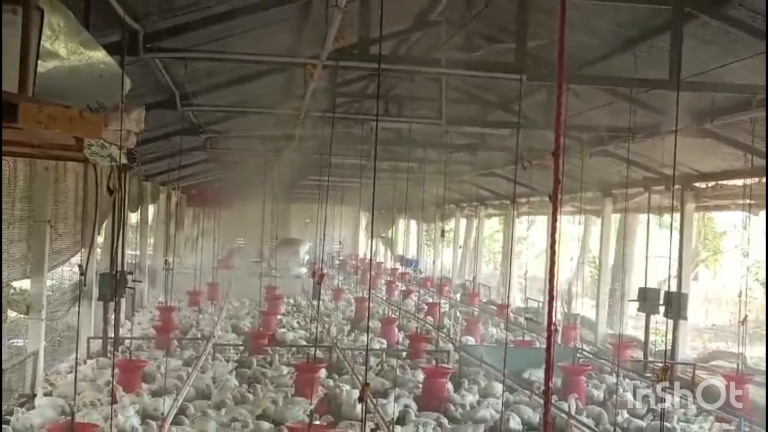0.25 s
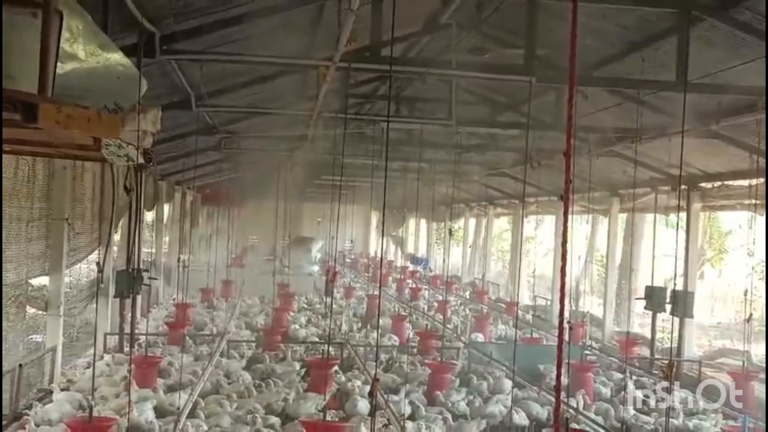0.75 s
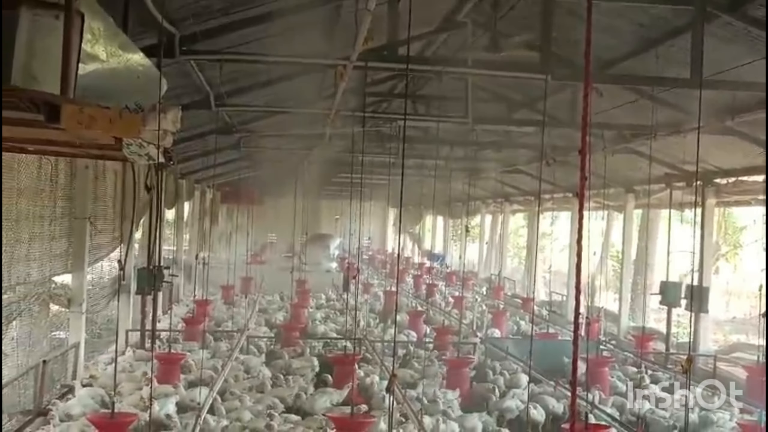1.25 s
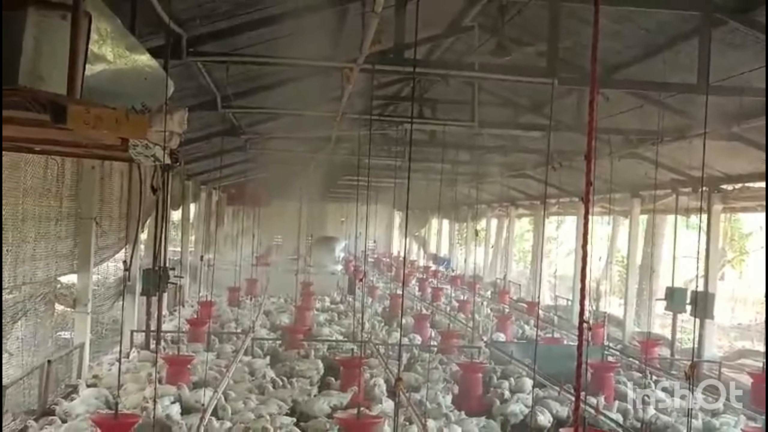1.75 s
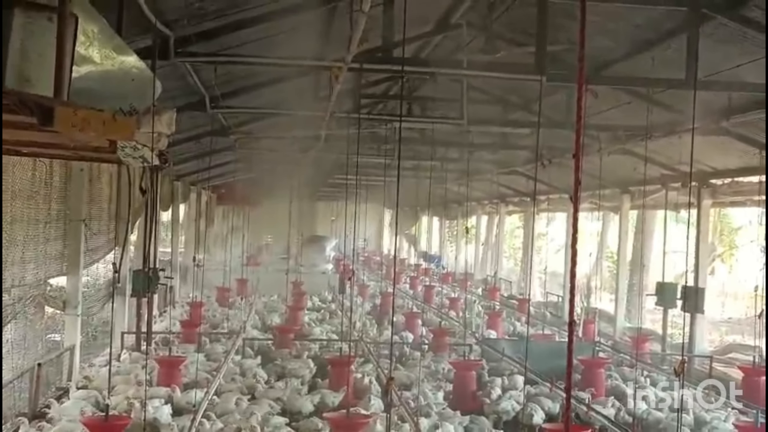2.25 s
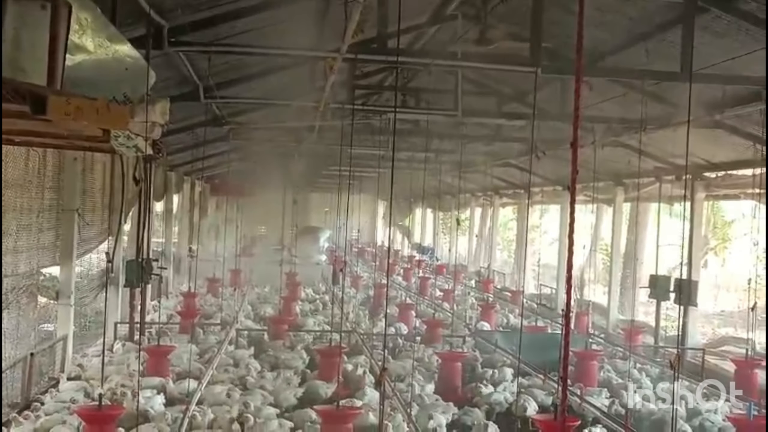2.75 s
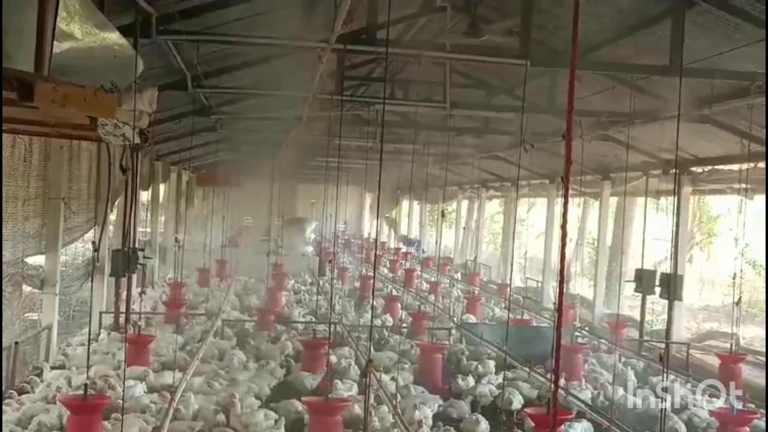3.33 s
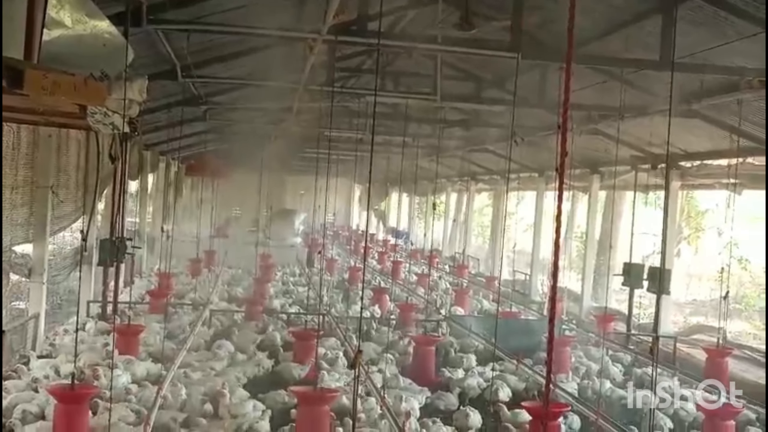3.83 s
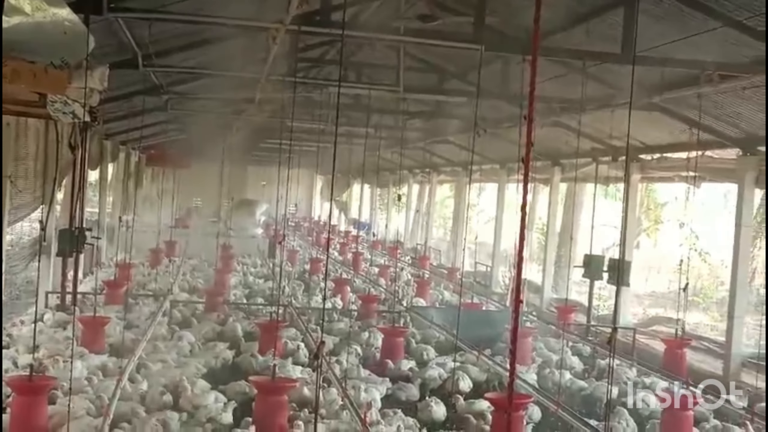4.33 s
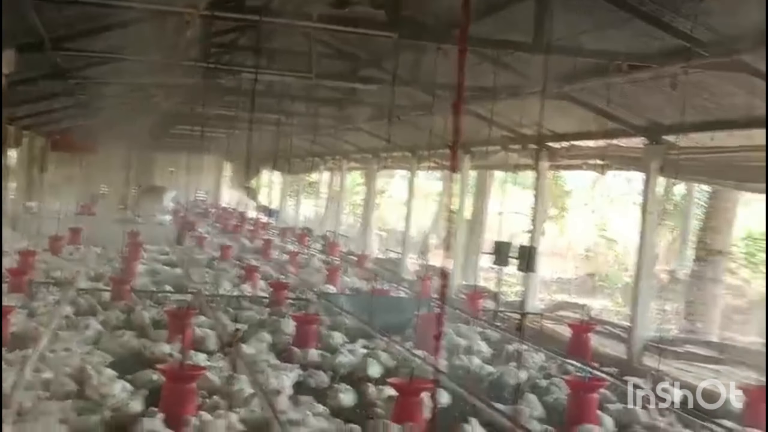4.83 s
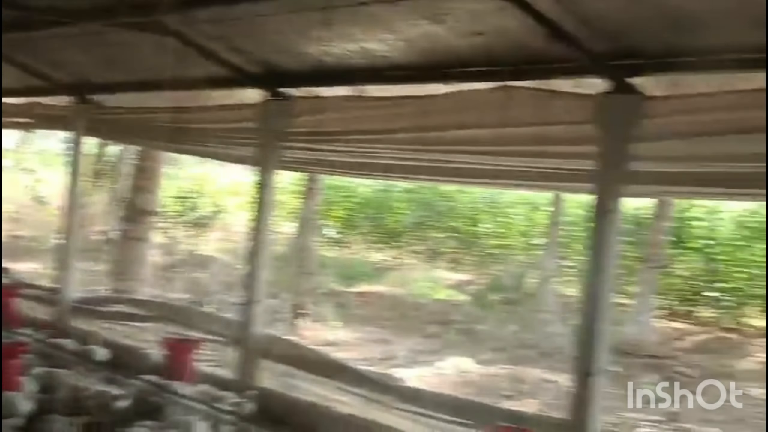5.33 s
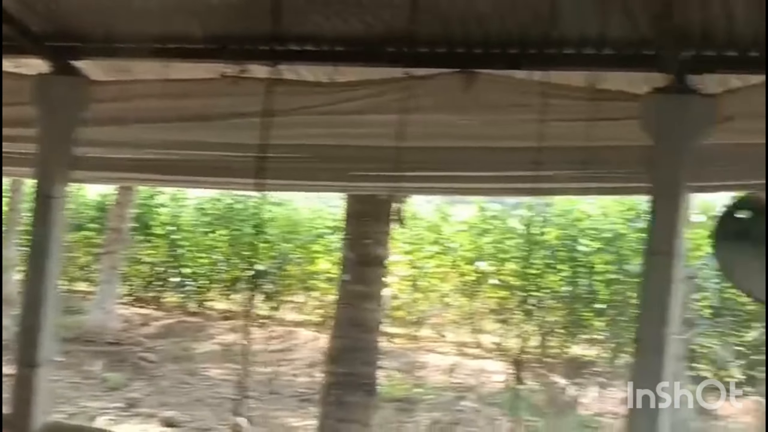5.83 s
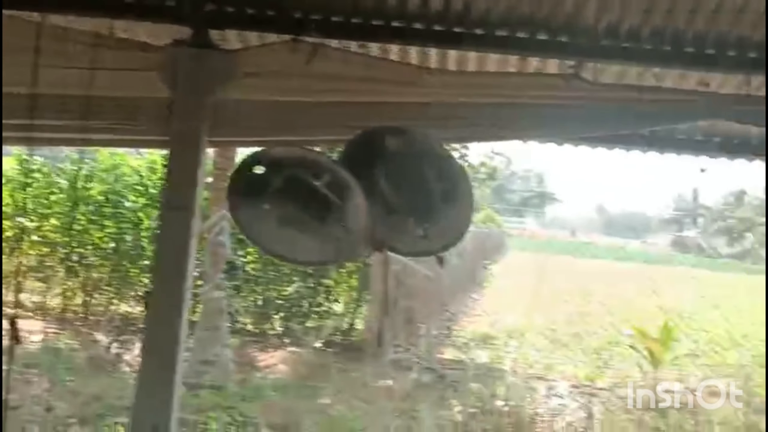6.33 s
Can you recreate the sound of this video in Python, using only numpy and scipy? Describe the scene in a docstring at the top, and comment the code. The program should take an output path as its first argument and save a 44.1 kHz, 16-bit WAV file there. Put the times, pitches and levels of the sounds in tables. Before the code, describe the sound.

A large flock of young chickens cheeps densely in a shed over a low throbbing machine hum and a faint mist hiss.

```python
"""A large flock of young chickens in an open-sided shed, heard by a two-port phone microphone.
From the start, near calls stand out of a dense chorus whose low edge cuts in and out, a machine hum
throbs over a low rumble and mist nozzles hiss overhead. From 0.5 s, harsh outbursts break in.
After 4.9 s the lower chorus fades as the phone turns away. The hum throbs hardest near 5.9 s;
a strong nozzle sputter and a loud near peep come just before the end."""
import sys
import numpy as np
from scipy import signal
from scipy.fft import rfft, irfft, next_fast_len
from scipy.io import wavfile
from scipy.ndimage import uniform_filter1d

SR = 44100
rng = np.random.default_rng(int(sys.argv[2]) if len(sys.argv) > 2 else 0)


def wav_out(sig):
    """Save sig, one row per channel (or a flat mono array), as 16-bit PCM at SR to the path in sys.argv[1]."""
    wavfile.write(sys.argv[1], SR, np.round(np.clip(np.atleast_2d(sig).T, -1, 1) * 32767).astype(np.int16))


N = 290178


def amp(db):
    return 10 ** (np.asarray(db) / 20)


def unit_rms(x):
    return x / np.sqrt(np.mean(x ** 2) + 1e-20)


def at_hz(curve, hz):
    """Value of a curve, interpolated over log frequency."""
    knots_hz, values = np.transpose(curve)
    return np.interp(np.log(hz + 1), np.log(knots_hz + 1), values)


def envelope(curve):
    """Gain per sample from rows of seconds and dB."""
    times_s, db = np.transpose(curve)
    return amp(np.interp(np.arange(N) / SR, times_s, db))


def colour(x, gain_db):
    """Filter by gain_db, a function of frequency in Hz."""
    size = next_fast_len(x.shape[-1])
    gain = amp(gain_db(np.fft.rfftfreq(size, 1 / SR)))
    return irfft(rfft(x, size) * gain, size)[..., :x.shape[-1]]


def wander(depth_db, top_hz):
    """Slow chance gain: sines of random phase up to top_hz."""
    t = np.arange(0, N + 64, 64) / SR
    rates_hz = np.geomspace(top_hz / 8, top_hz, num=24)
    waves = sum(np.sin(2 * np.pi * (hz * t + rng.random())) for hz in rates_hz)
    return amp(depth_db * np.interp(np.arange(N) / SR, t, unit_rms(waves)))


# Likeness of noise at the two ports. Each row: frequency in Hz, correlation.
PORT_CORRELATION = [(40, .3), (130, .9), (300, .9), (640, .5), (1300, 0), (1900, -.05), (2700, .25),
                    (3800, 0)]
def noise(spectrum, patch_db, flicker_db, fft_size):
    """Stereo noise with drifting patches and a flicker shared by all frequencies."""
    hop = fft_size // 4
    frames, hz = N // hop + 5, np.fft.rfftfreq(fft_size, 1 / SR)
    left_re, left_im, other_re, other_im, patches = rng.standard_normal((frames, len(hz), 5)).T
    patches = uniform_filter1d(patches, size=9, axis=0)
    patches = unit_rms(uniform_filter1d(patches, size=12, axis=1))
    flicker = unit_rms(uniform_filter1d(rng.standard_normal(frames), size=5))
    correlation = np.clip(at_hz(PORT_CORRELATION, hz), -1, 1)[:, None]
    left = left_re + 1j * left_im
    right = correlation * left + np.sqrt(1 - correlation ** 2) * (other_re + 1j * other_im)
    gain = amp(at_hz(spectrum, hz)[:, None] + patch_db * patches + flicker_db * flicker)
    _, out = signal.istft(np.array([left, right]) * gain, nperseg=fft_size, noverlap=fft_size - hop)
    return unit_rms(out[:, :N])


def calls(rows, rasp, harmonics, tint, max_lag_samples):
    """Gliding tones, rough from the uneven flutter of the syrinx; tint scales the voice colour."""
    out = np.zeros((2, N + SR))
    draws = rng.random((len(rows), 2))
    flutters = rng.standard_normal((len(rows), 40)) * np.reshape(rasp, (-1, 1))
    k = np.arange(1, harmonics + 1)
    for row, (lag, start_cycle), flutter in zip(rows, draws, flutters):
        start_s, length_s, start_hz, end_hz, db, pan_db, step_db = row
        progress = np.linspace(0, 1, max(round(length_s * SR), 64))
        cycles = np.cumsum(start_hz + (end_hz - start_hz) * progress) / SR + start_cycle
        mid_hz = (start_hz + end_hz) / 2
        voice_db = at_hz(VOICE_SPECTRUM, k * mid_hz) - at_hz(VOICE_SPECTRUM, mid_hz)
        gains = amp(step_db * (k - 1) + tint * voice_db) * (k * mid_hz < 7500)
        tone = gains @ np.sin(2 * np.pi * k[:, None] * cycles)
        tone *= 1 + np.interp(260 * length_s * progress, np.arange(len(flutter)), flutter)
        tone *= np.sin(np.pi * progress ** .75) ** .9
        start = round(max(start_s, 0) * SR)
        out[0, start + round(2 * max_lag_samples * lag):][:len(tone)] += amp(db + pan_db / 2) * tone
        out[1, start + max_lag_samples:][:len(tone)] += amp(db - pan_db / 2) * tone
    return out[:, :N]


def crowd(count, low_hz, high_hz, spread_db, fall):
    """Rows for calls(): short, falling, log-spread in pitch, a few birds nearer than the rest."""
    start, length, pitch, glide, distance, side = rng.random((count, 6)).T
    start_s, length_s = start * N / SR, .022 + .035 * length
    hz = low_hz * (high_hz / low_hz) ** pitch
    drop = fall * (glide + .15)
    db = -spread_db * np.log(distance + 0.047)
    pan_db, step_db = 16 * (side - .5), np.full(count, -2.5)
    return np.transpose([start_s, length_s, hz * (1 + drop), hz * (1 - drop), db, pan_db, step_db])


def shed_echo(x, t60_s):
    """Sparse reflections of random sign from roof, floor and posts."""
    taps = np.zeros((2, SR // 2))
    delays = np.arange(200, SR // 2 - 20, 20) + rng.integers(0, 20, (2, (SR // 2 - 201) // 20))
    np.put_along_axis(taps, delays, rng.choice([-1., 1.], delays.shape), 1)
    taps *= amp(-60 * np.arange(SR // 2) / SR / t60_s)
    return signal.fftconvolve(x, taps / np.linalg.norm(taps[0]), axes=1)[:, :N]


# Colour of the flock's voices. Each row: frequency in Hz, gain in dB.
VOICE_SPECTRUM = [(600, -62), (800, -44), (920, -24), (1030, -4), (1130, 0), (1510, -2), (2360, -5),
                  (2800, -11.5), (3150, -22), (3540, -25), (3900, -24), (4400, -29), (4800, -25),
                  (5100, -19), (5470, -19), (7500, -26), (8700, -30), (9360, -40), (16000, -60)]
# Ebb and swell of the chorus. Each row: time in seconds, gain in dB.
CHORUS_GAIN = [(0.0, -29), (.33, -28.5), (.51, -31), (.78, -30), (2.34, -29), (2.52, -30.5), (2.72, -29.5),
               (3.9, -30), (4.59, -29), (5.59, -29), (6.38, -29), (6.49, -31.5), (6.57, -28.5)]
# Fade of the lower chorus as the phone turns away. Each row: time in seconds, gain in dB.
TURN_GAIN = [(0.0, 0.5), (4.9, -0.5), (5.6, -7.5), (6.57, -9.5)]
# Top of the chorus, near 3.4 kHz, and the high peeps. Each row: time in seconds, gain in dB.
TOP_GAIN = [(0.0, -47), (0.99, -46.5), (1.19, -45), (1.41, -44.5), (2.22, -48), (2.35, -43), (2.78, -48.5),
            (2.9, -45), (3.17, -47.5), (3.3, -43.5), (4.01, -50.5), (4.4, -42), (4.53, -43.5), (5.0, -49.5),
            (5.13, -44.5), (5.42, -51), (5.55, -49), (5.66, -50), (5.92, -49), (6.21, -47), (6.58, -51)]
def chorus():
    """Over a hundred peeps a second, melting with distance into a murmur of the same colour."""
    rows = crowd(count=900, low_hz=950, high_hz=3500, spread_db=1.4, fall=.08)
    peeps = calls(rows, rasp=.7, harmonics=5, tint=0, max_lag_samples=18)
    peeps = colour(peeps + shed_echo(peeps, t60_s=0.89), lambda hz: at_hz(VOICE_SPECTRUM, hz))
    murmur = noise(VOICE_SPECTRUM, patch_db=2.3, flicker_db=0.66, fft_size=1024)
    flock = amp(-1.5) * unit_rms(peeps) + amp(-4.0) * murmur
    low = colour(flock, lambda hz: -12 * (hz / 1900) ** 3)
    top = colour(flock, lambda hz: -12 * (np.log2((hz + 1) / 3400) / .45) ** 4)
    rest = flock - top - low
    # The bottom of the chorus dips whenever the low edge cuts out.
    bottom = colour(flock, lambda hz: -12 * (hz / 1080) ** 8)
    dips = np.minimum(envelope(LOW_EDGE_GAIN) / amp(-47), 1) ** 0.39
    low = envelope(TURN_GAIN) * (low + (dips - 1) * bottom)
    body = envelope(CHORUS_GAIN) * wander(depth_db=0.16, top_hz=8.3) * (rest + low)
    return body + envelope(TOP_GAIN) * wander(depth_db=2.2, top_hz=8.3) * unit_rms(top)


def high_peeps():
    """Scattered hoarse peeps above the chorus, blurred by the shed."""
    rows = crowd(count=110, low_hz=2520, high_hz=3147, spread_db=2.5, fall=0.098)
    direct = calls(rows, rasp=1.8, harmonics=2, tint=3.2, max_lag_samples=18)
    echo = amp(18.0) * shed_echo(direct, t60_s=0.14)
    return envelope(TOP_GAIN) * amp(-6) * unit_rms(direct + echo)


# The low edge cutting in and out. Each row: time in seconds, gain in dB.
LOW_EDGE_GAIN = [(0.0, -50), (.4, -37.5), (.6, -57.5), (.8, -42), (.98, -42), (1.07, -59), (1.16, -40.5),
                 (1.6, -37.5), (1.77, -59), (1.87, -40.5), (2.04, -46.5), (2.15, -47), (2.4, -40),
                 (2.53, -60), (2.65, -45), (3.4, -45), (3.68, -58), (3.87, -42.5), (4.05, -61), (4.15, -60),
                 (4.55, -40), (4.7, -60), (4.82, -38), (5.05, -67), (5.25, -42), (5.53, -59), (5.68, -43),
                 (5.92, -46), (6.13, -78), (6.28, -40.5), (6.47, -62), (6.57, -40)]
def low_edge():
    """The flock's low edge, about 700-1000 Hz, cutting in and out."""
    rows = crowd(count=700, low_hz=723, high_hz=979.4, spread_db=3.5, fall=0.1)
    direct = calls(rows, rasp=0.31, harmonics=1, tint=0, max_lag_samples=10)
    gain = envelope(LOW_EDGE_GAIN) * wander(depth_db=2, top_hz=6.5) * amp(-2.0)
    return gain * unit_rms(direct + amp(-1.0) * shed_echo(direct, t60_s=0.19))


# Calls of near birds. Each row: start in seconds, length in seconds, start pitch in Hz,
# end pitch in Hz, level in dB, left minus right in dB, rasp as flutter depth.
NEAR_CALLS = [(0, 0.036, 4850, 4400, -42, -3, 0.57), (0.019, 0.036, 842, 790, -32.5, -2, 0.23),
              (0.067, 0.045, 874, 753, -37.5, -3, 0.3), (0.243, 0.038, 3026, 2720, -34, -3, 0.31),
              (0.264, 0.042, 2475, 2375, -26.5, -3, .15), (.3, 0.033, 2290, 1980, -28.5, 1, 0.45),
              (.304, 0.018, 1410, 1286, -28.5, 2, 0.35), (0.352, 0.036, 1396, 1260, -28.5, 1, .3),
              (0.374, 0.054, 607, 586, -54, 9, 0.33), (0.418, 0.0356, 1312, 1180, -24.5, -3, 0.18),
              (0.531, 0.052, 2150, 2130, -35, -5, 0.23), (0.535, 0.046, 1129, 1036, -36.5, -1, 0.32),
              (0.585, 0.022, 1634, 1610, -29.5, 5, .3), (.648, 0.032, 1550, 1480, -28, -5, 0.8),
              (0.76, 0.035, 1360, 1025, -29, 7, 0.38), (0.754, 0.048, 1590, 1510, -29, -5, 0.57),
              (0.896, 0.036, 1180, 997, -27.5, -1, 0.37), (1.017, 0.039, 633, 603, -34.5, -1.5, 0.11),
              (1.124, 0.063, 728, 677, -46, 5, 0.37), (1.302, 0.049, 1286, 1020, -33, -10, .5),
              (1.309, 0.026, 1636, 1590, -28.5, -8, .5), (1.423, 0.062, 836, 810, -37.5, -2, 0.22),
              (1.554, .047, 871, 750, -33.5, -1, 0.24), (1.684, 0.011, 1680, 1640, -24.5, -8, .3),
              (1.708, 0.051, 3180, 2720, -36, -5, 0.05), (1.768, 0.073, 2390, 2150, -35, -9, 0.89),
              (1.809, 0.048, 1682, 1585, -29, -3, 0.38), (1.84, 0.056, 909, 796, -33.5, -4, 0.7),
              (2.008, 0.055, 2780, 2490, -39, -7, .4), (2.177, 0.037, 845, 720, -32.5, -2, 0.24),
              (2.153, 0.03, 3210, 2930, -40, 0, .3), (2.191, 0.045, 5700, 5350, -45, 1, 1.0),
              (2.185, 0.043, 3140, 2490, -33, -5, .3), (2.313, 0.052, 1910, 1496, -32.5, -6, 0.92),
              (2.647, 0.066, 3100, 2430, -33.5, -2, .3), (2.706, 0.05, 1648, 997, -29, 0, 0.46),
              (2.715, 0.072, 935, 738, -36, 2, 0.47), (3.263, 0.043, 854, 764, -39, 2, 0.34),
              (3.429, 0.073, 3270, 2590, -43, -3, 0.28), (3.369, 0.12, 630, 580, -51, 6, 0.54),
              (3.461, 0.034, 600, 585, -39, 8, 0.55), (3.513, 0.06, 590, 557, -39.5, 5, 0.48),
              (3.574, 0.049, 576, 528, -50, 7, 0.62), (3.591, 0.036, 1744, 1620, -29.5, -3, 0.36),
              (3.78, 0.053, 3150, 2590, -38.5, -7, 1.4), (4.24, 0.04, 3180, 2800, -36, -5, 1.2),
              (3.807, 0.076, 1265, 1154, -34.5, -11, 0.83), (3.962, 0.034, 5770, 5480, -44, 3, 1.4),
              (4.299, 0.041, 5660, 5570, -46, 9, 1.2), (4.026, 0.035, 1108, 945, -33, -5, 0.33),
              (4.058, 0.035, 1670, 1520, -32, -10, .4), (4.193, 0.05, 1033, 945, -35.5, -3, 0.47),
              (4.118, 0.051, 893, 677, -42, 3, 0.64), (4.282, 0.083, 1252, 1226, -32, -7, 0.7),
              (4.577, 0.074, 5950, 5600, -46, 3, 1.4), (4.667, 0.034, 1660, 1600, -32, 3, .4),
              (4.717, 0.064, 2177, 2256, -33, -10, .3), (4.787, 0.046, 1150, 1160, -27, 1, .25),
              (4.787, 0.057, 828, 702, -49, -7, 0.35), (4.888, 0.03, 2200, 2120, -31, 5, .6),
              (5.098, 0.044, 2230, 2020, -30.5, -6, .5), (5.107, 0.033, 1083, 1015, -33.5, -7, 0.65),
              (5.159, 0.039, 2210, 2095, -26.5, 2, 0.15), (5.19, 0.069, 1232, 1113, -32, -3, 0.46),
              (5.217, 0.0064, 1400, 1280, -19, -4, 0.092), (5.37, 0.03, 2143, 2045, -28.5, -5, .4),
              (5.399, 0.036, 1117, 844, -30, -1, 0.43), (5.637, 0.027, 972, 790, -27.5, -4, .4),
              (5.873, 0.028, 1182, 945, -27.5, -6, 0.4), (6.314, 0.037, 6260, 5500, -37, 0, 1.3),
              (6.367, 0.034, 1545, 1535, -17, -1, 0.087), (6.389, 0.037, 1410, 1125, -29.5, -1, 0.82),
              (6.511, 0.037, 702, 730, -49, 8, 0.23)]
def near_birds():
    """Single calls, each from its own side with a short echo; shrill ones have stronger overtones."""
    rows = np.array(NEAR_CALLS)
    start_hz, rasp = rows[:, 2], rows[:, 6]
    step_db = np.where(start_hz > 2550, -13, -22.5)  # per overtone
    direct = calls(np.column_stack([rows[:, :6], step_db]), rasp, harmonics=8, tint=.4, max_lag_samples=5)
    return direct + amp(-6.5) * shed_echo(direct, t60_s=.25)


# Drifting strength of the machine's three-throb cycle.
# Each row: time in seconds, then gain in dB of the first, second and third throb.
THROB_GAINS = [(0.0, -60, -65, -57.5), (.6, -49, -64, -60), (1.2, -52.5, -70, -56), (2.0, -62, -65, -55.5),
               (3.1, -65, -62, -58.5), (3.6, -69, -59, -59), (4.2, -70, -67, -52.5), (5.0, -71, -52.5, -66),
               (5.4, -56, -62, -59), (5.65, -69, -49, -71.5), (5.9, -74, -37.5, -44.5),
               (6.2, -73, -48, -46), (6.5, -61, -39.5, -78)]
def throbbing(first_s=.115, period_s=.1148, stretch_s=.000054, dips_db=(6, 11, 8)):
    """Gain of the slowing machine: cycles of three throbs, with a dip after each throb."""
    t = np.arange(N) / SR
    times_s, *cycle_db = np.transpose(THROB_GAINS)
    beats = np.arange(-1, int(N / SR / period_s) + 1)
    peaks_s = first_s + period_s * beats + stretch_s * beats ** 2 / 2
    peaks_db = [np.interp(s, times_s, cycle_db[beat % 3]) for beat, s in zip(beats, peaks_s)]
    position = np.interp(t, peaks_s, beats)
    dip_db = np.take(dips_db, np.floor(position).astype(int) % 3) * np.sin(np.pi * position) ** 2
    return amp(np.interp(t, peaks_s, peaks_db) - dip_db)


# Tones of the machine. Each row: frequency in Hz, width in Hz, relative level in dB,
# throb exponent, ratio of steady to wavering part.
HUM_TONES = [(142.6, 14, -1.5, 1.0, 2.06), (102, 13, -7, 0.75, 0.93), (165, 32, -11.5, 1.5, 0.44),
             (194, 12, -21, 1.1, 1.3), (249, 12, -24, -0.2, 1.1)]
def machine_hum(sag_per_s=.0045):
    """Sines carrying slow noise, throbbing together; the pitch sags as the machine slows a little."""
    t, out = np.arange(N) / SR, np.zeros((2, N))
    throb = throbbing() / amp(-57.0)
    for hz, width_hz, db, exponent, steady in HUM_TONES:
        pole = np.exp(-np.pi * width_hz / SR)
        shared, side = rng.standard_normal((2, N)) + 1j * rng.standard_normal((2, N))
        waver = signal.lfilter([1], np.convolve([1, -pole], [1, -pole]), [shared, shared + 0.47 * side])
        carrier = np.exp(2j * np.pi * hz * t * (1 - sag_per_s * t / 2))
        tone = ((steady + waver / np.std(waver)) * carrier).real
        out += amp(db) * throb ** exponent * tone
    return amp(-57.5) * out


# Colour of the rumble. Each row: frequency in Hz, gain in dB.
RUMBLE_SPECTRUM = [(20, -27), (60, -16), (140, -4), (260, -9.5), (440, -18), (700, -18), (1200, -18.5)]
def rumble():
    """Low noise that throbs a little with the hum."""
    bed = amp(-57.5) * noise(RUMBLE_SPECTRUM, patch_db=0.0, flicker_db=1.3, fft_size=2048)
    return bed * (throbbing() / amp(-56.5)) ** 0.095


# Colour of the nozzle hiss. Each row: frequency in Hz, gain in dB.
MIST_SPECTRUM = [(4000, -7), (9000, -2), (12100, 11.5), (14000, 6.5), (16000, 5)]
# Strength of the hiss. Each row: time in seconds, gain in dB.
MIST_GAIN = [(0.0, -49), (0.18, -47.5), (0.41, -53.5), (0.79, -52.5), (1.59, -48.5), (3.28, -45),
             (3.89, -50), (4.39, -48), (4.8, -52.5), (5.13, -49.5), (5.57, -51), (5.78, -49), (6.57, -57.5)]
# Nozzle sputters. Each row: start in seconds, jump height in dB.
SPUTTERS = [(0.0677, -53), (2.6174, -54), (6.1464, -42), (6.4133, -49)]
def mist_nozzles(sputters_per_s=25, decay_s=0.021):
    """Spray hiss; listed sputters and small random ones lift it suddenly and die away."""
    hiss_gain = envelope(MIST_GAIN)
    kicks = (rng.random(N) < sputters_per_s / SR) * 0.5 * rng.random(N) * hiss_gain
    starts_s, db = np.transpose(SPUTTERS)
    kicks[np.round(starts_s * SR).astype(int)] = amp(db)
    sputter_gain = signal.lfilter([1], [1, -np.exp(-1 / (decay_s * SR))], kicks)
    spray = noise(MIST_SPECTRUM, patch_db=1.8, flicker_db=1.2, fft_size=512)
    return (hiss_gain + sputter_gain) * amp(-3.0) * spray


# Harsh outbursts from the birds.
# Each row: start in seconds, length in seconds, centre in Hz, width in octaves, level in dB.
OUTBURSTS = [(0.531, 0.064, 1050, 0.2, -32), (0.905, 0.082, 1350, 0.65, -28),
             (1.016, 0.052, 6400, 0.14, -39.5), (1.309, 0.031, 1610, 0.58, -29),
             (1.818, 0.089, 1530, 0.88, -28), (2.595, 0.042, 1370, 0.68, -25.5),
             (3.461, 0.07, 1240, 0.64, -31), (0.718, 0.08, 3100, 0.29, -42.5),
             (2.377, 0.12, 3240, 0.24, -49), (4.571, 0.051, 2850, 0.28, -39),
             (1.316, 0.0039, 4600, .7, -43), (5.627, 0.063, 1090, 0.46, -28)]
def outbursts():
    """Short swells of noise, each in one wide resonance."""
    out = np.zeros((2, N))
    for start_s, length_s, centre_hz, octaves, db in OUTBURSTS:
        size = round(length_s * SR)
        puff = rng.standard_normal((2, size))
        puff = puff + 0.11 * puff[::-1]  # partly shared by both ports
        puff = colour(puff, lambda hz: -12 * (np.log2((hz + 1) / centre_hz) / octaves) ** 2)
        out[:, round(start_s * SR):][:, :size] += amp(db) * unit_rms(puff) * signal.windows.hann(size)
    return out


def scene():
    """Birds, rolled off below 545 Hz, with hum, mist and rumble."""
    birds = chorus() + high_peeps() + low_edge() + near_birds() + outbursts()
    birds = colour(birds, lambda hz: -60 * np.clip(np.log2(545 / (hz + 1)), 0, 1))
    return birds + machine_hum() + mist_nozzles() + rumble()


# Balance of the microphone ports. Each row: frequency in Hz, left minus right in dB.
PORT_BALANCE = [(40, -8), (92, -4), (140, 0), (330, -1.5), (500, 3.5), (1170, 0.5), (2740, 1.5), (4190, 14),
                (5200, 6), (6800, 8), (9000, 4), (15000, -1.5)]
def record(dry):
    """Each port colours the sound its own way; a low-pass limits the band to 15.8 kHz."""
    ports = colour(dry, lambda hz: np.outer([.5, -.5], at_hz(PORT_BALANCE, hz)))
    lowpass = signal.firwin(511, 15800, window=("kaiser", 9), fs=SR)
    return signal.oaconvolve(ports, lowpass[None], "same")


dry = scene()
out = record(dry)
wav_out(out)
```